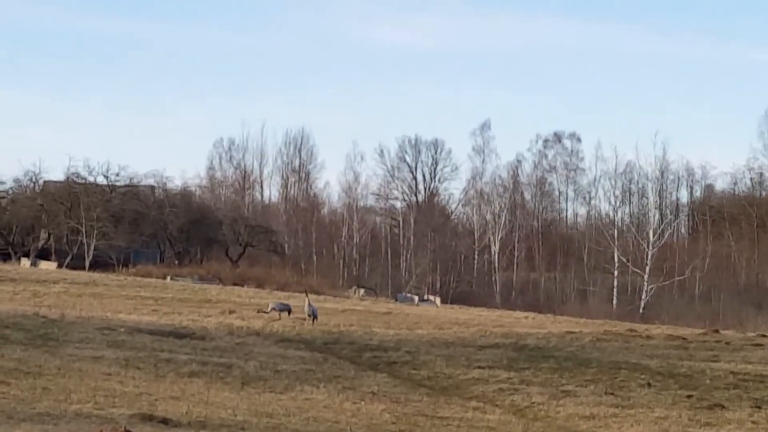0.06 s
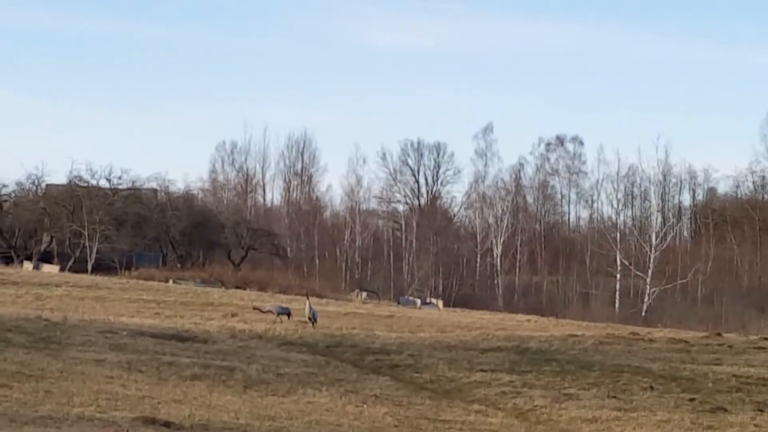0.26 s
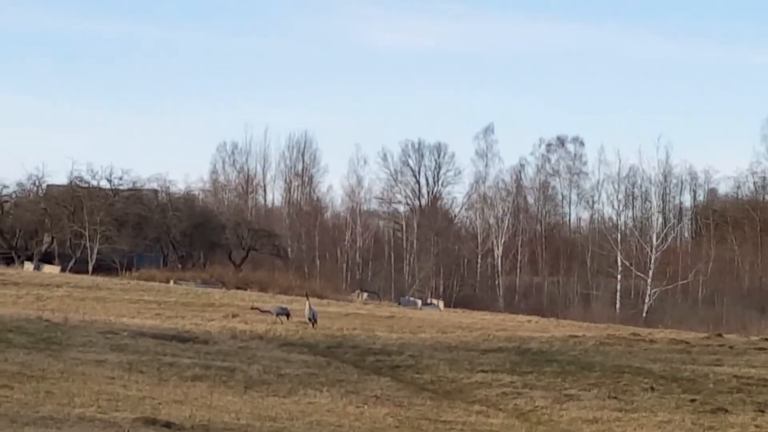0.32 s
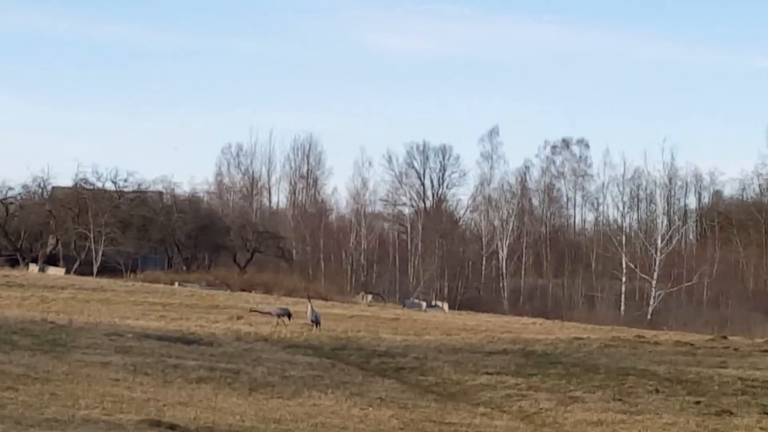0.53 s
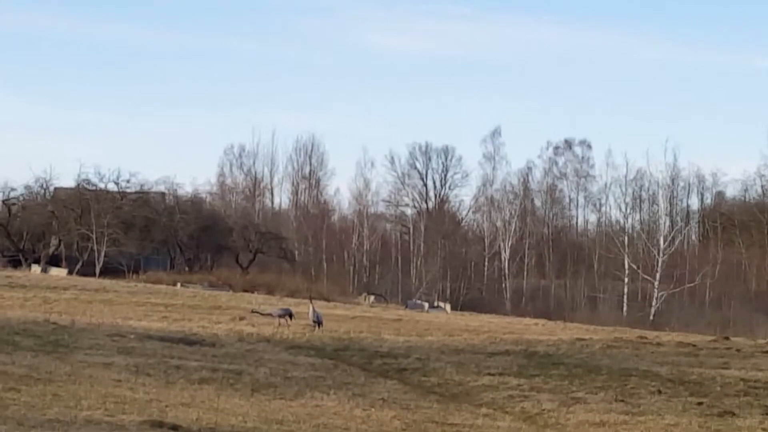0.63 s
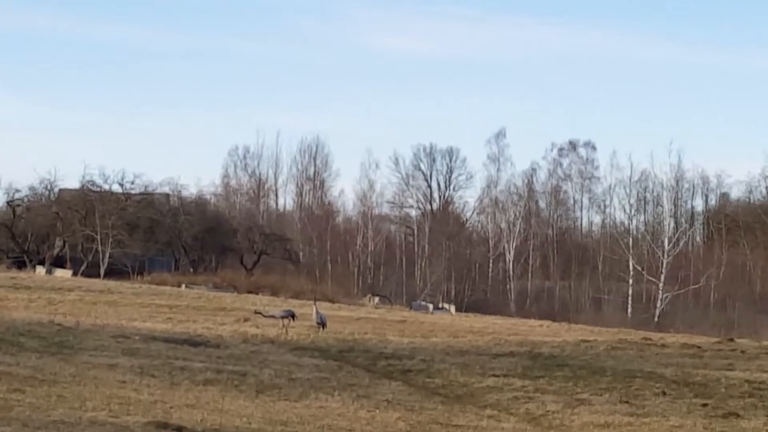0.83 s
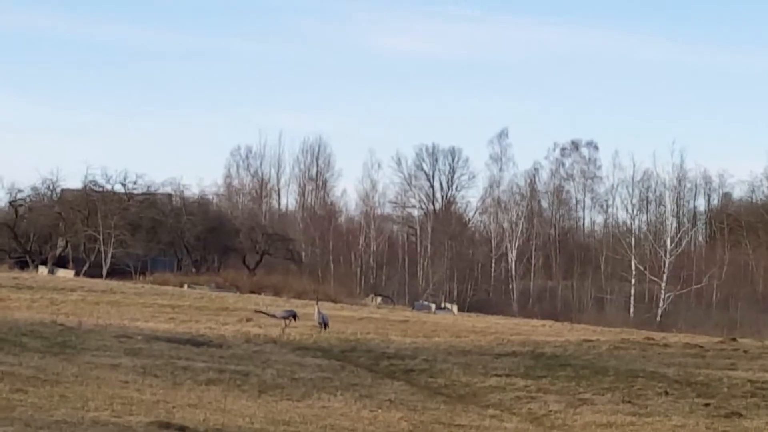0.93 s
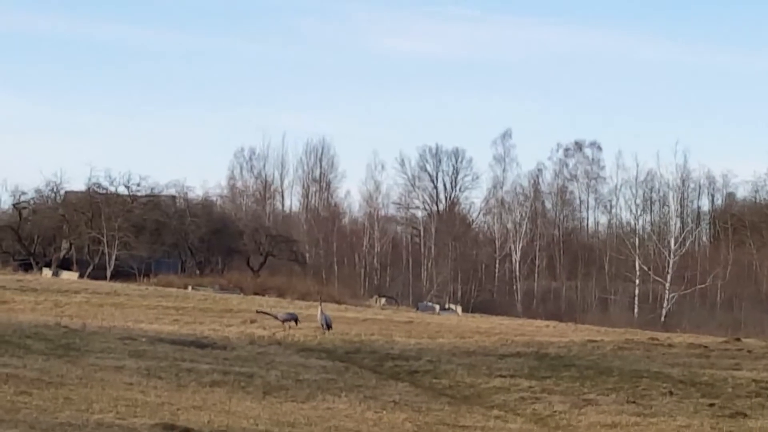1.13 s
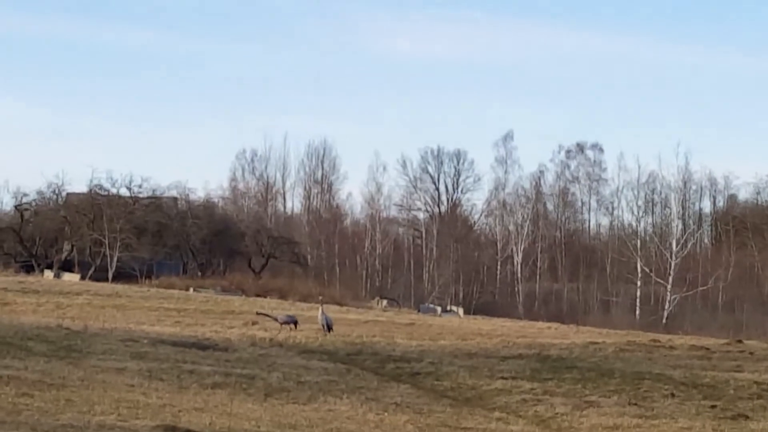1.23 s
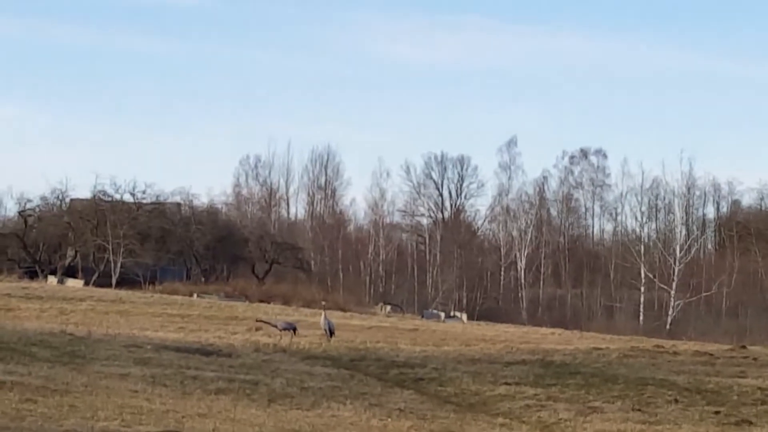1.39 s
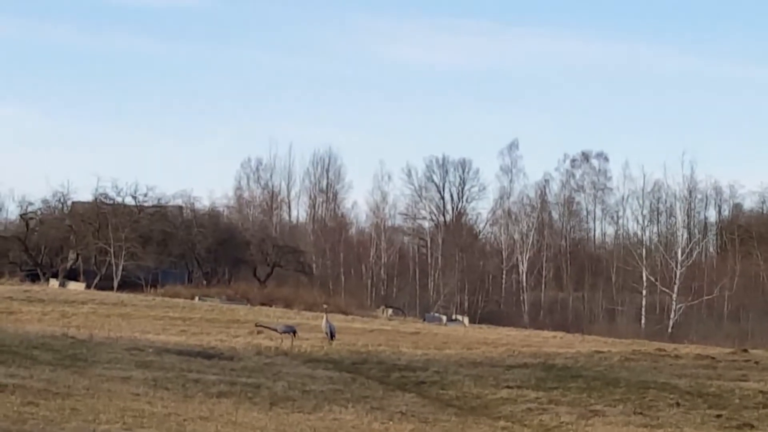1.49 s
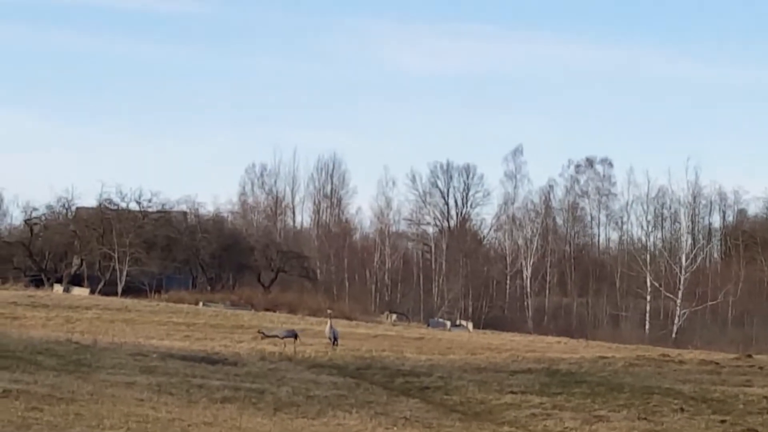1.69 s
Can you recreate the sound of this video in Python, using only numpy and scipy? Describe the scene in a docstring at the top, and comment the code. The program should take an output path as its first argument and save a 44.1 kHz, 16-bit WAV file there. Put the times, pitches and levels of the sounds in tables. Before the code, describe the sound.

A crane's harsh trumpeting call is answered by a lower one, echoing faintly outdoors.

```python
"""Two cranes call in turn across an open field, the higher voice first, the lower one answering.
Each voice is a source and a filter: membranes release pulses, and a filter gives them their colour.
A call creaks into a bright trumpet tone, turns harsh where a second vibration modulates its pulses,
then sags and creaks out. The forest edge returns a dull tail over a low rumble of air,
a faint steady tone and one soft low bump."""
import sys
import numpy as np
from scipy import signal
from scipy.fft import rfft, irfft, next_fast_len
from scipy.io import wavfile

SR = 44100
rng = np.random.default_rng(int(sys.argv[2]) if len(sys.argv) > 2 else 0)


def log_audio(samples):
    """Write samples as a 16-bit WAV file to the path given in sys.argv[1]."""
    # one column per channel
    frames = np.atleast_2d(samples).T
    # limit to full scale, then quantise
    limited = np.clip(frames, -1, 1)
    pcm = np.round(limited * 32767).astype(np.int16)
    wavfile.write(sys.argv[1], SR, pcm)


N = 77175
T = np.arange(N) / SR
SIZE = next_fast_len(2 * N)
HZ = np.maximum(np.arange(SIZE // 2 + 1) * SR / SIZE, 1)
KHZ = HZ / 1000
ONSET_S, CUTOFF_HZ = .005, 15700


def from_db(db):
    """Amplitude ratio: tenfold for every 20 dB."""
    return 10 ** (np.asarray(db) / 20)


def rms_one(x):
    """Normalisation to unit mean power."""
    return x / np.sqrt(np.mean(x ** 2) + 1e-20)


def in_time(rows):
    """Linear interpolation of each column of a curve at every sample."""
    time_s, *columns = np.transpose(rows)
    return [np.interp(T, time_s, column) for column in columns]


def at_hz(points, hz=HZ):
    """Interpolation of a spectrum on a log-frequency axis."""
    frequency_hz, value = np.transpose(points)
    return np.interp(np.log(hz), np.log(frequency_hz), value)


def gate(start_s, end_s, fade_s):
    """A trapezoidal window, half open at the two given times."""
    return np.clip(np.minimum(T - start_s, end_s - T) / fade_s + .5, 0, 1)


def filtered(x, response):
    """Convolution, as a product of spectra."""
    return irfft(rfft(x, SIZE) * response, SIZE)[..., :N]


def causal(db):
    """Minimum-phase response from the folded cepstrum: it rings only after a pulse."""
    cepstrum = irfft(np.log(from_db(db)), SIZE)
    cepstrum[1:SIZE // 2] *= 2
    cepstrum[SIZE // 2:] = 0
    return np.exp(rfft(cepstrum))


def dulled(x, tilt_db_per_khz):
    """Spectral tilt: softer closures carry less treble. A rising tilt counts as flat."""
    gains = from_db(min(tilt_db_per_khz, 0) * np.linspace(0, SR / 2000, 65))
    return np.convolve(x, np.fft.fftshift(irfft(gains)), "same")


def air_noise(spectrum, correlation=0.39):
    """Partial coherence: mid and side noise sum to two partly alike channels of unit rms."""
    mid, side = filtered(rng.standard_normal((2, N)), from_db(at_hz(spectrum)))
    return rms_one(np.sqrt(1 + correlation) * mid + np.sqrt(1 - correlation) * side * [[1], [-1]])


def background():
    """Superposition of background noise, fading in at the start, a faint pure tone and one low bump."""
    # noise spectrum of the open air: frequency_hz, relative_db
    air_spectrum = [(25, -26), (300, -9), (600, -15), (1000, -13.5), (1600, -19), (3000, -18.5),
                    (7000, -28.5), (15500, -31)]
    # noise spectrum of the rumble: frequency_hz, relative_db
    rumble_spectrum = [(20, -15.5), (60, -2.5), (130, -8), (300, -17), (600, -18.5), (1500, -56)]
    # noise spectrum of the bump: frequency_hz, relative_db
    bump_spectrum = [(40, -35), (110, -5.5), (165, -4), (300, -10), (600, -33), (2000, -55)]
    tone_hz, bump_s, bump_width_s = 1356, 1.092, .011
    fade_in_s, fade_in_db = 0.45, 5.5
    tone = from_db(-75) * np.sqrt(2) * np.sin(2 * np.pi * tone_hz * T)
    bump = from_db(-51.5) * np.exp(-((T - bump_s) / bump_width_s) ** 2) * air_noise(bump_spectrum)
    air = from_db(-67.5) * air_noise(air_spectrum)
    rumble = from_db(-66) * air_noise(rumble_spectrum)
    fade_in = from_db(fade_in_db * np.minimum(T / fade_in_s - 1, 0))
    return fade_in * (air + rumble) + tone + bump


def far_echo(x):
    """Diffuse reflection: the far treeline returns the sound late, faint, dull and blurred."""
    delay_s, t60_s, level_db, tilt_db_per_khz = 0.59, 0.37, -19, -7
    blur = rng.standard_normal((2, N)) * (T > delay_s) * from_db(-60 * np.abs(T - delay_s) / t60_s)
    response = rfft(rms_one(blur) / np.sqrt(N), SIZE)
    return filtered(x, response * from_db(level_db + tilt_db_per_khz * KHZ))


def reverberation(x):
    """Scattering: a quick return from the field, a slow one from the forest, decaying exponentially."""
    # scattered sound by band: centre_hz, field_db, forest_db, forest_t60_s
    bands = [(400, -20, -4, 2.8), (933, -32, -6, 1.74), (1420, -37, -17, 6), (2060, -9.5, -17, 1.44),
             (3134, -11.5, -31.5, 0.82), (3740, -8, -22, 0.71), (7700, -7, -61, 0.48)]
    field_t60_s, forest_delay_s, forest_build_s = 0.15, 0.04, 0.081
    field = rms_one(from_db(-60 * T / field_t60_s))
    build_up = np.clip((T - forest_delay_s) / forest_build_s, 0, 1)
    response, centres_hz = 0, [row[0] for row in bands]
    for this_band, (_, field_db, forest_db, forest_t60_s) in zip(np.eye(len(bands)), bands):
        forest = rms_one(build_up * from_db(-60 * T / forest_t60_s))
        envelope = np.hypot(from_db(field_db) * field, from_db(forest_db) * forest) / np.sqrt(N)
        power_share = np.interp(np.log(HZ), np.log(centres_hz), this_band)
        response = response + envelope * filtered(rng.standard_normal((2, N)), np.sqrt(power_share))
    return filtered(x, rfft(response, SIZE))


def stereo_colouring(x):
    """Stereo colouring: level and phase differences between the channels vary with frequency."""
    # channel differences: frequency_hz, left_minus_right_db, left_lead_rad
    differences = [(770, -0.5, 0.25), (900, -2.5, 0.87), (1700, -1.5, 0.6), (2136, 10, -0.48),
                   (2420, -14, -1.05), (3120, -1, 0.59), (3970, 1, -0.56), (4550, -0.5, 0.73),
                   (6100, 4.5, 0.92), (6500, 4.5, -0.47), (8200, 0, 0.7), (11700, -1, 1.9)]
    rows = np.array(differences)
    left = from_db(at_hz(rows[:, :2]) / 2) * np.exp(.5j * at_hz(rows[:, ::2]))
    return filtered(x, np.array([left, 1 / left]))


def creak(start_s, end_s, level_db, tilt_db_per_khz, low_cut_hz, colour):
    """Aperiodic vibration: the membranes flap unevenly, giving thin pulses with hiss between them."""
    pulses_per_s, spread_db, hiss_gain = 300, 2.5, 0.19
    onsets = (np.cumsum(rng.uniform(.3, 1.7, N // 20)) / pulses_per_s * SR).astype(int)
    sizes = from_db(spread_db * rng.standard_normal(len(onsets)))
    pulses = rms_one(np.bincount(onsets[onsets < N], sizes[onsets < N], N))
    pulses += hiss_gain * rng.standard_normal(N)
    high_pass = 1j * HZ / (low_cut_hz + 1j * HZ)
    path = high_pass * from_db(min(tilt_db_per_khz, 0) * KHZ + at_hz(colour))
    rms_after_filter = np.sqrt(np.mean(np.abs(path) ** 2) * np.var(pulses))
    burst = filtered(pulses * gate(start_s, end_s, ONSET_S), high_pass)
    return from_db(level_db) / rms_after_filter * dulled(burst, tilt_db_per_khz)


def trumpet(call, shakes, jitter, colour):
    """A harmonic pulse train; a slower vibration modulates its phase and amplitude, adding sidebands."""
    jitter_band_hz, shake_lead_cycles = 355, 0.45
    envelope = gate(call[0][0], call[-1][0], ONSET_S)
    live = envelope > 0
    pitch_hz, level_db, tilt_db_per_khz, jitter_cycles = np.array(in_time(call) + in_time(jitter))[:, live]
    low_pass = signal.butter(2, jitter_band_hz, fs=SR, output="sos")
    scatter = rms_one(signal.sosfilt(low_pass, rng.standard_normal(N)))[live]
    steady_cycles = np.cumsum(pitch_hz) / SR
    cycles, strength = steady_cycles + jitter_cycles * scatter, 1
    for start_s, end_s, pitch_ratio, swing_cycles, depth, fade_s in shakes:
        shake_phase = 2 * np.pi * pitch_ratio * (steady_cycles + shake_lead_cycles)
        shaking = gate(start_s, end_s, fade_s)[live]
        cycles = cycles + swing_cycles * shaking * np.sin(shake_phase)
        strength = strength + depth * shaking * np.cos(shake_phase)
    harmonics = np.arange(1, int(CUTOFF_HZ / np.median(pitch_hz)) + 1)[:, None]
    gains = from_db(tilt_db_per_khz * pitch_hz / 1000) ** harmonics
    pulses = np.sum(gains * np.cos(2 * np.pi * harmonics * cycles), axis=0)
    power_after_filter = np.sum((gains * from_db(at_hz(colour, harmonics * pitch_hz))) ** 2, axis=0) / 2
    tone = np.zeros(N)
    tone[live] = pulses / np.sqrt(power_after_filter) * strength * from_db(level_db)
    return tone * envelope


def crane(call, shakes, jitter, creaks, snaps, colour):
    """Source and filter: tone, creaks and snaps share one tone colour and the windpipe's dispersion."""
    delay_ms_per_khz = 0.087  # the treble leaves a little later
    source = trumpet(call, shakes, jitter, colour) + sum(creak(*row, colour) for row in creaks)
    for time_s, impulse_db, tilt_db_per_khz in snaps:
        source += from_db(impulse_db) * dulled(signal.unit_impulse(N, int(time_s * SR)), tilt_db_per_khz)
    dispersion = np.exp(-1j * np.pi * delay_ms_per_khz * KHZ ** 2)
    return filtered(source, causal(at_hz(colour)) * dispersion)


def answering_crane():
    """The lower voice, near 770 Hz: period doubling adds a weak subharmonic late in the call."""
    # course of the tone: time_s, pitch_hz, level_db, tilt_db_per_khz
    call = [(1.055, 680, -44.5, -3.5), (1.08, 759, -40.5, -1.6), (1.112, 765.6, -35, -0.17),
            (1.145, 777.5, -36, -0.36), (1.25, 776.2, -34.5, -0.15), (1.32, 770.5, -35, -0.044),
            (1.42, 765.6, -36, 0.05), (1.505, 750.6, -37, -0.3), (1.54, 733, -38.5, -0.7),
            (1.562, 695, -43.5, -2.7), (1.582, 694, -44, -3), (1.592, 625, -57, -6)]
    # second vibration: start_s, end_s, pitch_ratio, swing_cycles, depth, fade_s
    shakes = [(1.39, 1.538, .5, 0.0077, 0.071, 0.11)]
    # scatter of pulse timing: time_s, jitter_cycles
    jitter = [(1.06, 0.019), (1.091, 0.011), (1.11, 0.0012), (1.14, 0.0002), (1.48, 0.00094),
              (1.56, 0.0031), (1.59, 0.027)]
    # runs of slow uneven pulses: start_s, end_s, level_db, tilt_db_per_khz, low_cut_hz
    creaks = [(1.035, 1.062, -52, -3.7, 400), (1.053, 1.067, -45, -0.5, 1490),
              (1.068, 1.09, -43.5, 0.3, 2600), (1.588, 1.646, -49, -4.5, 398),
              (1.64, 1.668, -61.5, -5.5, 400)]
    # single hard snaps of the voice: time_s, impulse_db, tilt_db_per_khz
    snaps = [(1.0457, -5.5, -0.78), (1.046, -15, -1.1), (1.06, -6.5, -0.43), (1.5963, -21, -1.7),
             (1.615, -11, -1), (1.632, -15, -1.6)]
    # tone colour of the lower call: frequency_hz, gain_db
    colour = [(300, -22.5), (600, -13.5), (775, -14), (1150, -6.5), (1550, -5.5), (1900, 2.5),
              (2330, -16.5), (2650, -5), (3080, -1.5), (3450, -7), (3860, -6.5), (4220, -5.5),
              (4800, -16.5), (5430, -17.5), (6950, -21), (7800, -36.5), (8550, -38), (9300, -28),
              (10100, -38), (12400, -27.5), (14000, -46), (16000, -60.5)]
    return crane(call, shakes, jitter, creaks, snaps, colour)


def leading_crane():
    """The higher voice, near 1030 Hz: bouts of deep modulation make it harsh."""
    # course of the tone: time_s, pitch_hz, level_db, tilt_db_per_khz
    call = [(.199, 916, -34, 0.95), (.21, 946, -35.5, 0.64), (.266, 959.5, -29.5, 0.88),
            (.274, 1033, -30.5, 0.5), (.33, 1031, -28.5, 0), (.43, 1029, -29, 0.33), (.51, 1024, -29.5, 0),
            (.56, 1010, -30, -0.3), (.586, 978.4, -34.5, 0.5), (.594, 910.5, -33.5, -1.5),
            (.602, 971, -35, 1.86), (.606, 903, -39, -3.5), (.61, 926, -32.5, -1), (.625, 908, -37, 0),
            (.657, 902.5, -40, -1.5), (.668, 847.7, -39, -0.7), (.715, 815, -48.5, -2.5),
            (.74, 780, -55, -5)]
    # second vibration: start_s, end_s, pitch_ratio, swing_cycles, depth, fade_s
    shakes = [(0.209, 0.272, 0.094, 0.06, 0.24, 0.024), (0.18, 0.267, 0.28, 0.043, 0.29, 0.016),
              (0.277, 0.396, 0.3, 0.0079, 0.03, 0.018), (0.324, 0.38, 0.15, 0.0056, 0, 0.057),
              (0.381, 0.489, .4226, 0.056, 0.21, 0.061), (0.46, 0.57, 0.31, 0.02, 0.01, 0.1),
              (0.582, 0.636, 0.092, 0.087, 0.21, 0.016), (0.679, 0.716, 0.091, 0.029, 0.42, 0.018)]
    # scatter of pulse timing: time_s, jitter_cycles
    jitter = [(.2, 0.011), (.268, 0.028), (.295, 0.0049), (.37, 0.0057), (.44, 0.012), (.52, 0.0057),
              (0.591, 0.0047), (.605, 0.015), (.71, 0.011), (0.741, 0.082)]
    # runs of slow uneven pulses: start_s, end_s, level_db, tilt_db_per_khz, low_cut_hz
    creaks = [(0.183, .194, -39, -1, 3000), (0.732, 0.77, -50.5, -4.5, 1202),
              (0.768, 0.798, -57, -4.5, 1200)]
    # single hard snaps of the voice: time_s, impulse_db, tilt_db_per_khz
    snaps = [(0.1846, -9, 0), (0.1955, -7, 0), (0.6016, -4.5, 0), (.7335, -16, -1), (.7555, -19, -1)]
    # tone colour of the higher call, with a dip near 3750 Hz: frequency_hz, gain_db
    colour = [(250, -26), (510, -10.5), (700, -18), (900, -4), (1040, -9.5), (1250, -5), (1600, -3),
              (1900, 3.5), (2070, -1), (2300, -14), (2650, -12.5), (3100, -3.5), (3400, -9), (3750, -27.5),
              (4150, -21), (5200, -9), (6200, -16), (7200, -22), (8300, -19), (9700, -36), (10500, -33.5),
              (12400, -41), (14500, -42.5), (16000, -52)]
    return crane(call, shakes, jitter, creaks, snaps, colour)


def scene():
    """Superposition of the two calls, their reflections and the background."""
    calls = leading_crane() + answering_crane()
    return stereo_colouring(calls) + reverberation(calls) + far_echo(calls) + background()


def record(dry):
    """Band limiting: an elliptic low-pass cuts the highest treble steeply."""
    return signal.sosfilt(signal.ellip(10, .1, 80, CUTOFF_HZ, fs=SR, output="sos"), dry)


dry = scene()
out = record(dry)
log_audio(out)
```